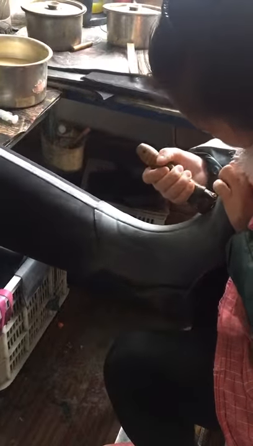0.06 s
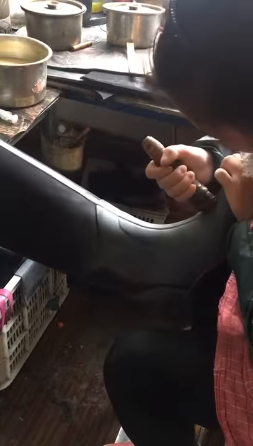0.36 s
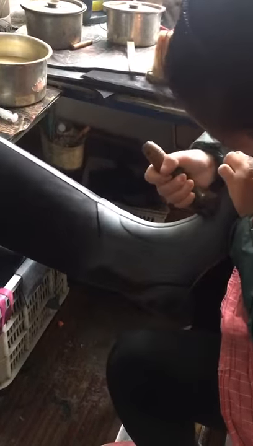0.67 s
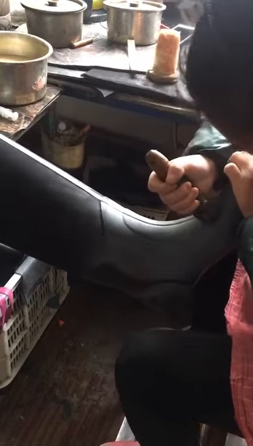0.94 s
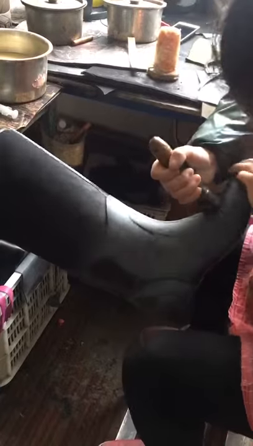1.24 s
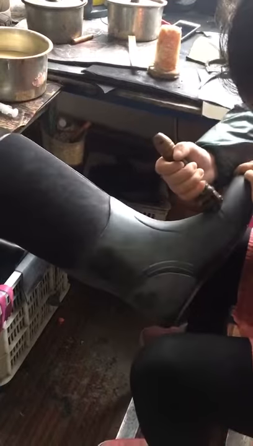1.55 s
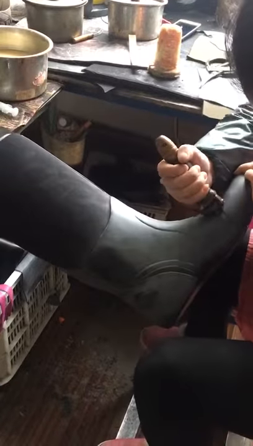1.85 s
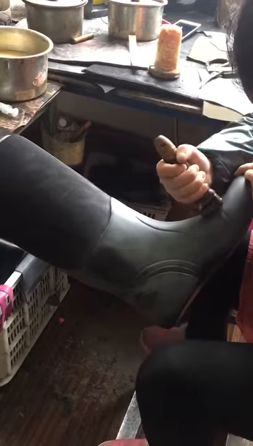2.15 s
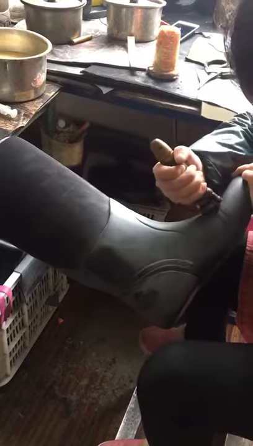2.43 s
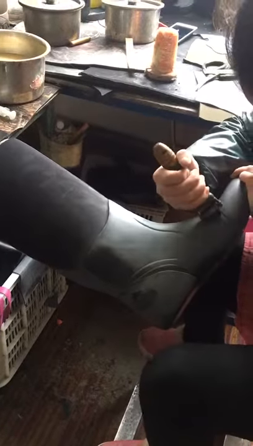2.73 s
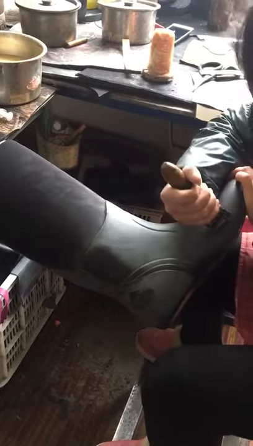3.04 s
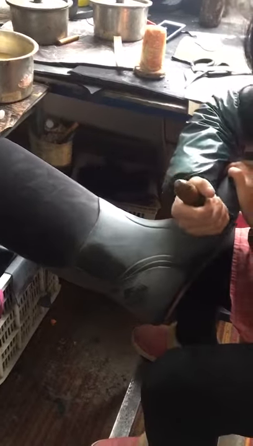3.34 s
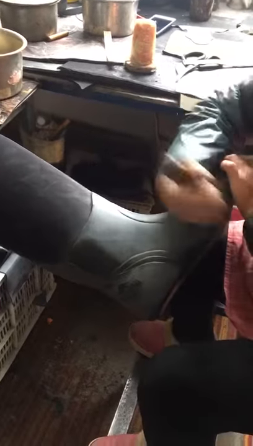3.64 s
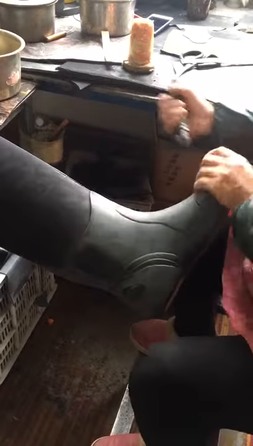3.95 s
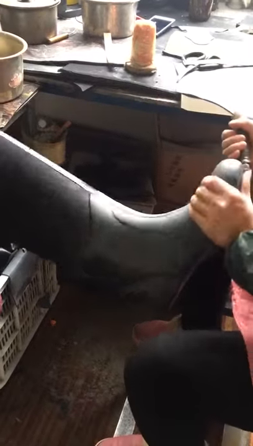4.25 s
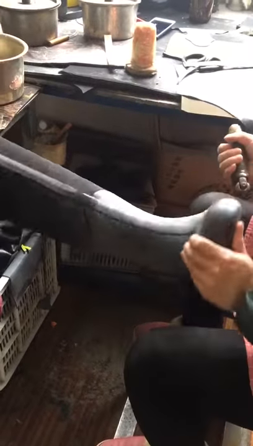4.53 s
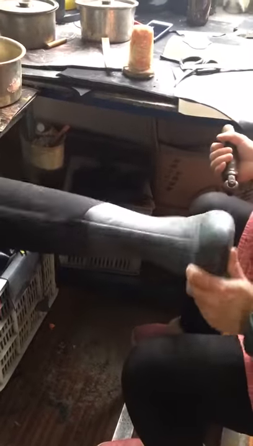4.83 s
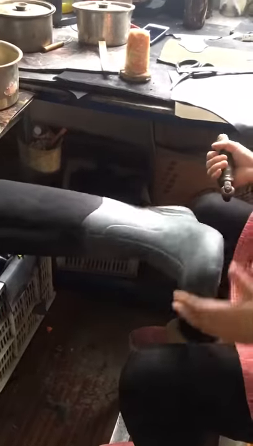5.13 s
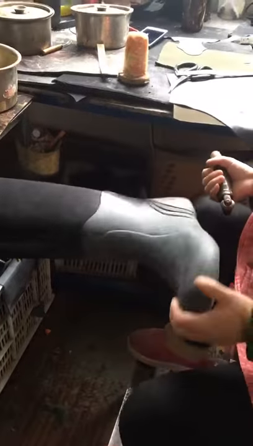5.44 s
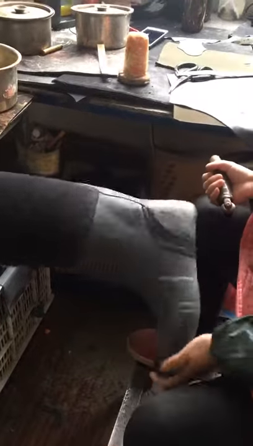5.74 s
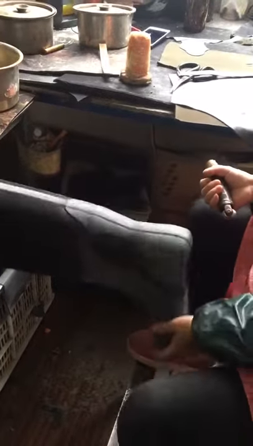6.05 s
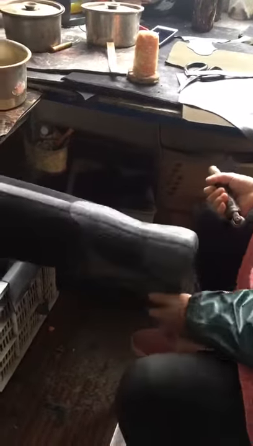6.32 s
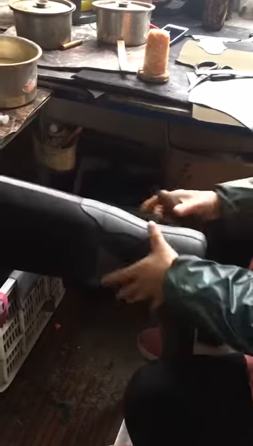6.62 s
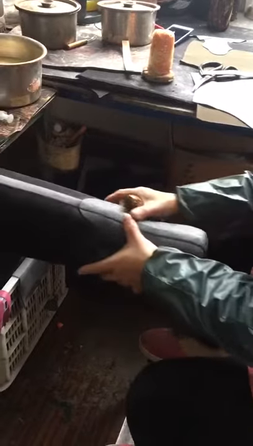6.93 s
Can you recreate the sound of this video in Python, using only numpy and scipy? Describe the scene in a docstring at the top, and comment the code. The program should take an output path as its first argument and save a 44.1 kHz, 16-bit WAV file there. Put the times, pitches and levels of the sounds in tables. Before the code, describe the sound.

Sharp wooden knocks come in irregular clusters near a single microphone, ringing in a workshop over a low hum. Faint rubber creaks precede the first cluster. In the lull after it, a wooden-handled tool quietly rasps and squeaks against a rubber boot. Then louder clatter follows, mixed with dull bumps as the boot is turned over, ending on a tick and a brief high squeal.

```python
"""A cobbler's bench in an echoing workshop, heard on one microphone over a low drone. A rubber boot creaks
as it is handled; hard things knock nearby, with soft bumps from the boot. From about 2.6 s a wooden-handled
tool is pressed along the rubber: it ticks and scrapes, then sticks and slips into a squeak. From 3.9 s the
knocks return in a clatter, the loudest working the recorder's limiter, and the boot is swung about with a
low rumble. A short high squeal comes at the end."""
import sys
import numpy as np
from scipy import signal
from scipy.fft import rfft, irfft, next_fast_len
from scipy.io import wavfile
from scipy.ndimage import uniform_filter1d, minimum_filter1d, map_coordinates

SR = 44100
rng = np.random.default_rng(int(sys.argv[2]) if len(sys.argv) > 2 else 0)


def dump(signal):
    """Clip the signal to [-1, 1] and save it as 16-bit WAV at the path in sys.argv[1]."""
    limited = np.clip(np.atleast_2d(signal).T, -1, 1)
    pcm = np.round(limited * 32767).astype(np.int16)
    wavfile.write(sys.argv[1], SR, pcm)


N = 316593
TIME = np.arange(N) / SR
TOP_HZ = 14300  # the recorder's upper limit


def amp(db):
    """Decibels to gain."""
    return 10 ** (np.asarray(db) / 20)


def unit(x):
    """Scale to rms 1."""
    return x / np.sqrt(np.mean(x ** 2) + 1e-20)


def along(points, hz):
    """Read a curve of (freq_hz, value) points joined on a log frequency axis."""
    freqs, values = np.transpose(points)
    return np.interp(np.log(hz + 1), np.log(freqs + 1), values)


def spectrum(points):
    """Turn (freq_hz, level_db) points into gain as a function of frequency."""
    return lambda hz: amp(along(points, hz))


def filtered(x, response):
    """Shape a sound by a frequency response."""
    size = next_fast_len(len(x) + 8192)
    return irfft(rfft(x, size) * response(np.fft.rfftfreq(size, 1 / SR)), size)[:len(x)]


def noise(response, size):
    """Coloured noise of rms 1."""
    return unit(filtered(rng.standard_normal(size), response))


def wobble(rate):
    """A smooth random curve, rate knots a second."""
    return map_coordinates(rng.standard_normal(int(N * rate / SR) + 4), [TIME * rate])


def add(track, start_s, sound):
    """Mix a sound into a track at start_s."""
    start = round(start_s * SR)
    track[start:start + len(sound)] += sound[:max(N - start, 0)]


def burst(response, t60_s, rise_s, crack=0):
    """Dense vibration that rises and dies away, with an optional brief crack at its start."""
    t = np.arange(SR // 2) / SR
    decay = amp(-60 * t / max(t60_s, .003)) + crack * amp(-60 * t / .012)
    shape = decay * (1 - np.exp(-t / rise_s))
    return unit(noise(response, len(t)) * shape) * np.sqrt(np.mean(shape ** 2))


# How long the workshop rings: freq_hz, t60_s
ROOM_DECAY = [(100, 1.06), (400, 1.29), (1500, 1.23), (3000, 1.09), (5000, 0.95), (8000, .5), (13000, 0.7)]
# Colour of its echo at the microphone: freq_hz, level_db
ROOM_COLOUR = [(100, 1.5), (400, -5.5), (1000, -7.5), (2200, -9.5), (4000, -13.5), (7000, -13.5),
               (13000, -14)]
def with_room(x, wet_db, build_s=0.004):
    """The direct sound plus the workshop's echo, which builds up and then dies faster in the treble."""
    hz, t, reflections = signal.stft(rng.standard_normal(SR * 3 // 2), SR, nperseg=256)
    t60 = along(ROOM_DECAY, hz)[:, None]
    equal_energy = np.sqrt(2 * np.log(1000) / (t60 * SR))
    fade = amp(-60 * t / t60) * equal_energy * (1 - np.exp(-t / build_s))
    colour = amp(along(ROOM_COLOUR, hz) + wet_db)[:, None]
    echo = signal.istft(reflections * fade * colour, SR)[1]
    return signal.fftconvolve(x, echo) + np.pad(x, (0, len(echo) - 1))


# Room tone of the workshop: freq_hz, level_db
ROOM_TONE = [(15, -45), (25, -14), (95, 1), (125, -19.5), (146, -3.5), (202, -13.5), (243, -14.5),
             (278, -19.5), (573, -24.5), (879, -26.5), (1060, -25.5), (2430, -32), (11500, -46),
             (13800, -44.5), (15000, -67)]
def room_tone(level_db=-55):
    """The workshop's low drone and faint hiss, wavering slightly in level."""
    return amp(level_db + 0.9 * wobble(5)) * noise(spectrum(ROOM_TONE), N)


# Swings of the boot: start_s, crest_s, end_s, crest_db
BOOT_SWINGS = [(4.3, 5.0, 5.9, -53), (5.9, 6.45, 7.1, -49.5)]
def swings():
    """A low rumble swells each time the boot is swung about."""
    rumble = noise(spectrum([(20, -20), (46, 3), (75, -5), (140, -37.5), (400, -100)]), N)
    swell = sum(amp(db) * np.interp(TIME, [start, crest, end], [0, 1, 0])
                for start, crest, end, db in BOOT_SWINGS)
    return swell * rumble


# Spells of creaking in the boot: start_s, length_s, first_slip_db
CREAK_SPELLS = [(0.182, 0.045, -41.5), (0.235, 0.05, -42), (0.635, 0.05, -49.5), (0.729, 0.02, -51),
                (3.503, 0.018, -45), (3.708, 0.008, -47)]
# Colour of the creaking wall: freq_hz, level_db
CREAK_COLOUR = [(300, -23), (800, -13), (1200, -0.5), (1600, -1), (1900, -7.5), (2900, -18.5),
                (4000, -14.5), (5000, -19.5), (6000, -17), (6600, -31), (12000, -35)]
def creaks(gap_s=0.012, uneven=0.2, fade_db_per_s=57):
    """Under slow pressure the rubber gives way in uneven little slips that weaken as it relaxes."""
    out = np.zeros(N)
    for start_s, length_s, first_slip_db in CREAK_SPELLS:
        spell = np.zeros(SR)
        for t in np.arange(0, length_s, gap_s):
            slip_s = abs(t + uneven * gap_s * rng.standard_normal())
            slip = burst(spectrum(CREAK_COLOUR), t60_s=0.033, rise_s=0.00034)
            add(spell, slip_s, amp(first_slip_db - fade_db_per_s * t) * slip)
        add(out, start_s, with_room(spell, wet_db=-7))
    return out


# Soft bumps of the handled boot: start_s, level_db, hollow_hz
BOOT_BUMPS = [(1.269, -39.5, 183), (1.402, -17, 332), (2.73, -44.5, 150), (2.801, -44, 128.5),
              (3.682, -40, 148.5), (3.731, -40.5, 160), (3.868, -35, 179.1), (4.693, -46, 250.6),
              (4.784, -28, 204), (5.667, -34, 207), (5.746, -38, 256), (6.1, -31.5, 495),
              (7.1, -31.5, 199.5), (7.128, -33, 224)]
def bumps(sharpness=3, slap=0.074, slack_hz=100, taut_hz=960, taut_from_hz=170):
    """A soft contact gives a dull push in a hollow: the tauter the wall, the higher it reaches."""
    out = np.zeros(N)
    for start_s, level_db, hollow_hz in BOOT_BUMPS:
        tautness = 1 / (1 + (taut_from_hz / hollow_hz) ** 20)
        edge_hz = slack_hz + (taut_hz - slack_hz) * tautness  # the sound rolls off an octave above this
        hollow = lambda hz: 1 / np.sqrt(1 + (sharpness * (hz / hollow_hz - hollow_hz / (hz + 1))) ** 2)
        colour = lambda hz: (hollow(hz) + slap * hz / (hz + 400)) / (1 + (hz / edge_hz / 2) ** 4)
        bump = burst(colour, t60_s=0.23, rise_s=0.0067)
        add(out, start_s, amp(level_db) * with_room(bump, wet_db=0))
    return out


# Light ticks of the tool at the bench: start_s, level_db
TOOL_TICKS = [(2.187, -42.5), (2.471, -49), (2.705, -41), (2.977, -39), (2.992, -42), (3.885, -39),
              (6.823, -33)]
def ticks():
    """The tool's steel edge catches and lets go."""
    out = np.zeros(N)
    colour = spectrum([(500, -16.5), (1500, 1), (4000, 6), (7000, -1), (11000, -3.5), (14000, -19)])
    for start_s, level_db in TOOL_TICKS:
        tick = burst(colour, t60_s=0.007, rise_s=0.00051)
        add(out, start_s, amp(level_db) * with_room(tick, wet_db=-8))
    return out


def squeal(crest_s=7.127, crest_hz=2925, crest_db=-26.5, linger_db=-41, sag_hz_per_s=500, waver_hz=22):
    """One nearly pure high tone swells, falls back and lingers, sagging in pitch."""
    t = TIME - crest_s
    pitch_hz = crest_hz - sag_hz_per_s * t + waver_hz * wobble(120)
    phase = 2 * np.pi * np.cumsum(pitch_hz) / SR
    rise_db = crest_db + 647.5 * t
    fall_db = np.maximum(crest_db - 800 * t, linger_db)
    level = amp(np.where(t < 0, rise_db, fall_db) + 1.5 * wobble(130))
    return with_room(np.sqrt(2) * level * np.sin(phase), wet_db=-7)[:N]


# Peaks in the colour of the knocks: centre_hz, width_hz, level_db
KNOCK_PEAKS = [(957, 18, 3), (1184, 61, -2.5), (1317, 380, -2.5), (1586, 16, 0), (1983, 20, -1),
               (2043, 76, -2.5), (2330, 22, -4.5), (2595, 100, -3.5), (2822, 150, -1), (3100, 46, -8),
               (3237, 47, 4), (3490, 100, -3.5), (3820, 30, -2.5), (3960, 53, 1), (4465, 230, -2.5),
               (5100, 18, -1.5), (5300, 15, -1.5), (6203, 12, 1.5), (6400, 18, 0), (7000, 9.1, 4.5),
               (8900, 38, 2)]
def knock_colour(hz, bed_db=-11):
    """Fixed peaks that colour every knock, standing over a weaker bed."""
    peaks = sum(amp(db) ** 2 / (1 + (2 * (hz - centre) / width) ** 2) for centre, width, db in KNOCK_PEAKS)
    return np.sqrt(peaks + amp(bed_db) ** 2)


# Hard blows near the microphone: start_s, clack_db, hardness_db (ring over clack), ring_hz, thud_db
BLOWS = [(0.952, -17, 4.5, 3040, -30), (1.258, -37, 2, 3270, -38.5), (1.289, -39, 2.5, 3260, -35.5),
         (1.311, -35, 1.5, 3230, -36.5), (1.344, -39, 2.5, 3270, -39.5), (1.39, -10, -5, 2920, -24.5),
         (1.398, -14.5, 1, 3290, -22), (3.898, -32, -9, 2650, -30.5), (3.9243, -16, 2.5, 3360, -34),
         (3.929, -14.5, -4, 3370, -25), (4.262, -22.5, 0.5, 2850, -41), (4.712, -38, -10, 2870, -37),
         (4.771, -19, -6, 3300, -32), (4.823, -26, -7, 3180, -27), (4.8599, -7.5, -6.5, 2920, -15.5),
         (4.868, -7, 1, 2884, -35), (4.878, -12, 1.5, 3110, -24.5), (4.904, -17.5, -2.5, 3540, -21.5),
         (5.654, -30, -9, 2800, -35.5), (5.709, -29.5, -4, 2800, -36), (5.719, -29, -3.5, 2800, -29),
         (5.729, -31.5, -6.5, 3100, -38.5), (5.933, -31, -8, 2650, -31), (5.94, -22.5, -9, 2650, -30),
         (5.972, -17, -6, 2630, -25.5), (6.009, -19.5, -8, 2650, -27), (6.145, -12.5, 0.5, 2930, -32),
         (6.151, -23.5, 2, 2790, -28.5), (6.219, -28, 0, 2650, -40)]
# Colours of a blow's four parts: freq_hz, level_db
CLACK_COLOUR = [(350, -29), (620, 2), (780, -11), (1000, -5), (1250, 1), (1600, 0), (2200, 3), (2600, -0.5),
                (3200, -25.5), (5000, -52)]
RING_COLOUR = [(1500, -26.5), (2400, -9), (2750, -2), (3150, -2.5), (3500, 1.5), (4300, -0.5),
               (4900, -14.5), (7000, -50)]
SNAP_COLOUR = [(3000, -26), (4900, 0.5), (5600, 4.5), (6900, -3), (7900, -10), (9000, -8), (10500, -14.5),
               (13500, -22), (15000, -44)]
THUD_COLOUR = [(35, -37.5), (70, -8.5), (120, -2), (205, 1.5), (255, -6.5), (305, -0.5), (374, 2),
               (480, -2), (620, -0.5), (760, -4), (1500, -49)]
def knocks(ring_width_hz=300, focus=1.3, spot_db=1.1, usual_clack_db=-15, usual_hardness_db=-5):
    """Each blow is a woody clack, a hard ring, a bright snap and a slower thud, set by force and hardness."""
    out = np.zeros(N)
    clack_band_hz = CLACK_COLOUR[0][0], CLACK_COLOUR[-1][0]
    for start_s, clack_db, hardness_db, ring_hz, thud_db in BLOWS:
        # a harder contact is brighter and rattles for less time
        tilt_db_per_octave = 0.45 * (hardness_db - usual_hardness_db)
        rattle_s = 0.083 * 2 ** (-hardness_db / 9)
        # a forceful, hard blow snaps more; a gentle one stays in contact longer
        snap_over_clack_db = 0.58 * clack_db + 0.38 * hardness_db - 1
        contact_s = 0.0007 * amp(0.45 * (usual_clack_db - clack_db))
        # each blow lands on another spot and favours other peaks
        spot = np.transpose([np.geomspace(500, 12000, 28), spot_db * rng.standard_normal(28)])
        body = lambda hz: amp(along(spot, hz)) * knock_colour(hz)
        tilt = lambda hz: amp(tilt_db_per_octave * np.log2(np.clip(hz, *clack_band_hz)))
        peak = lambda hz: 1 + focus / (1 + (2 * (hz - ring_hz) / ring_width_hz) ** 2)
        woody = lambda hz: amp(along(CLACK_COLOUR, hz)) * body(hz) * tilt(hz)
        pitched = lambda hz: amp(along(RING_COLOUR, hz)) * body(hz) * peak(hz)
        bright = lambda hz: amp(along(SNAP_COLOUR, hz)) * body(hz)
        clack = amp(clack_db) * burst(woody, rattle_s, rise_s=contact_s, crack=.5)
        ring = amp(clack_db + hardness_db) * burst(pitched, rattle_s, rise_s=.0005, crack=.7)
        snap = amp(clack_db + snap_over_clack_db) * burst(bright, rattle_s, rise_s=.00033, crack=.46)
        thud = amp(thud_db) * burst(spectrum(THUD_COLOUR), t60_s=0.18, rise_s=.0047)
        add(out, start_s, with_room(clack + ring + snap + thud, wet_db=0.5))
    return out


# Strokes of the tool along the boot, slow slips rasping and fast ones squeaking:
# start_s, crest_s, end_s, crest_db, end_slip_hz (at both ends), crest_slip_hz, pointedness
TOOL_STROKES = [(2.586, 2.598, 2.65, -52, 640, 570, 4), (2.70, 2.728, 2.765, -49, 900, 760, 4),
                (2.896, 3.008, 3.12, -43.5, 900, 600, 5), (3.088, 3.099, 3.12, -51, 1220, 1240, 3),
                (3.122, 3.162, 3.212, -49.5, 1200, 1315, 1.6), (3.245, 3.285, 3.35, -50.5, 1235, 1295, 1.5),
                (3.33, 3.451, 3.51, -44, 1320, 1375, 1.1)]
FAST_SLIP_HZ = 1334  # slip rate of a mellow squeak, with no tilt on its overtones
def grip(swell_db=12, touch_s=0.0071):
    """Pressure arches over each stroke and sets both the slip rate and the strength."""
    slip_hz, strength = np.full(N, float(FAST_SLIP_HZ)), np.zeros(N)
    for start_s, crest_s, end_s, crest_db, end_slip_hz, crest_slip_hz, pointedness in TOOL_STROKES:
        pressure = np.sin(np.interp(TIME, [start_s, crest_s, end_s], [0, np.pi / 2, 0])) ** pointedness
        contact = np.clip(np.minimum(TIME - start_s, end_s - TIME) / touch_s, 0, 1)
        slip_hz = np.where(contact > 0, end_slip_hz + (crest_slip_hz - end_slip_hz) * pressure, slip_hz)
        strength += contact * amp(crest_db + swell_db * (np.sqrt(pressure) - 1))
    return slip_hz, strength


def roughness(slip_hz, touching, least=0.1, rough_below_hz=735, bite_s=0.012):
    """Slips are uneven (up to 1) when they are slow, and just after the tool bites."""
    rough = least + (1 - least) / (1 + (slip_hz / rough_below_hz) ** 12)
    for start_s in TIME[1:][touching[1:] & ~touching[:-1]]:
        rough += (TIME >= start_s) * np.exp(-np.abs(TIME - start_s) / bite_s)
    return np.clip(rough, 0, 1)


# Colours of the tool and the boot's wall, squeaking and rasping: freq_hz, level_db
SQUEAK_COLOUR = [(400, -4), (800, 1), (1250, -0.5), (1380, 7), (1900, -4), (2700, -8.5), (3400, -9.5),
                 (4000, 2.5), (4600, -13), (5500, -15), (6500, -22.5), (7700, -29), (9500, -26.5),
                 (12500, -39.5)]
RASP_COLOUR = [(400, -15), (900, -2.5), (1700, 2), (2700, -4), (3400, -9.5), (4000, 4), (4700, -11.5),
               (6000, -7.5), (7400, -20), (9500, -7.5), (10600, -14), (12000, -17.5), (14000, -27)]
def scrape(jitter=0.093, waver=0.008, rough_waver=0.05, shimmer_db=2, harmonics=19):
    """Rubber sticks and slips under the tool: even slips squeak, uneven ones rasp."""
    slip_hz, strength = grip()
    touching = strength > 0
    rough = roughness(slip_hz, touching)
    pitch_hz = slip_hz * (1 + jitter * rough * wobble(500) + (waver + rough_waver * rough) * wobble(60))
    phase = 2 * np.pi * np.cumsum(pitch_hz) / SR
    # slow slips break loose more abruptly than fast ones, which tilts their overtones up
    tilt_db_per_octave = 5.5 * np.log2(FAST_SLIP_HZ / pitch_hz[touching])
    squeak, power = np.zeros(N), np.zeros(touching.sum())
    for k in range(1, harmonics + 1):
        hz = k * pitch_hz[touching]
        colour_db = along(SQUEAK_COLOUR, hz) + tilt_db_per_octave * np.log2(k)
        size = amp(colour_db + shimmer_db * wobble(65)[touching]) * (hz < TOP_HZ)
        squeak[touching] += size * np.sin(k * phase[touching])
        power += size ** 2 / 2
    squeak[touching] /= np.sqrt(power)
    # each slip sheds a puff of friction noise
    puffs = 1 + 0.24 * np.cos(phase)
    rasp = unit(noise(spectrum(RASP_COLOUR), N) * puffs * amp(2 * wobble(260)))
    friction = np.sqrt(1 - rough ** 2) * squeak * amp(wobble(90)) + rough * rasp
    return with_room(strength * friction, wet_db=-3.5)[:N]


def scene():
    """Everything that reaches the microphone at the cobbler's bench, in mono."""
    return (knocks() + ticks() + creaks() + bumps() + scrape() + squeal() + room_tone() + swings())[None]


def record(dry, ceiling=0.7, low_cut_hz=36):
    """The recorder's fast limiter holds down the peaks; the deepest bass and highest treble are dropped."""
    needed_gain = ceiling / np.maximum(np.abs(dry[0]), ceiling)
    # the gain ducks smoothly for a couple of milliseconds around each peak
    gain = uniform_filter1d(minimum_filter1d(needed_gain, size=90), size=90)
    passband = lambda hz: (hz < TOP_HZ) * hz ** 4 / (hz ** 4 + low_cut_hz ** 4)
    return filtered(dry[0] * gain, passband)[None]


dry = scene()
out = record(dry)
dump(out)
```